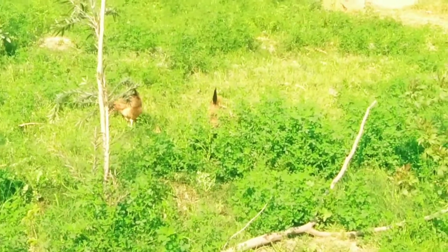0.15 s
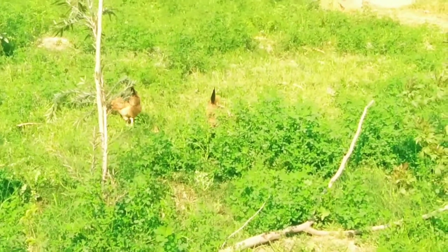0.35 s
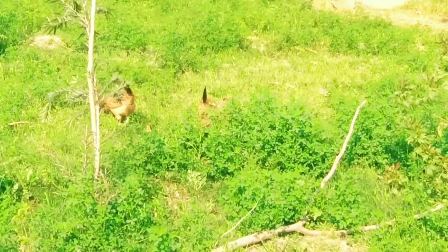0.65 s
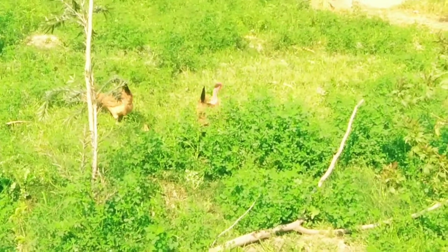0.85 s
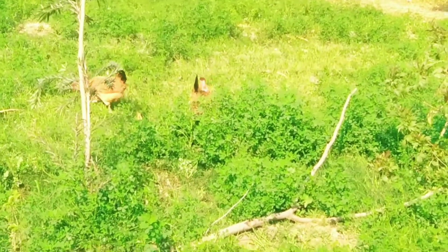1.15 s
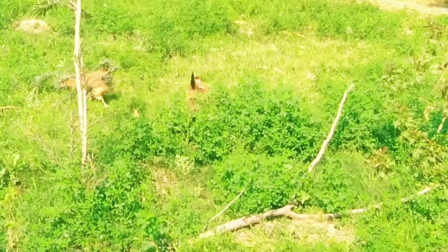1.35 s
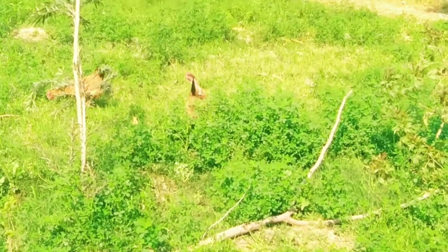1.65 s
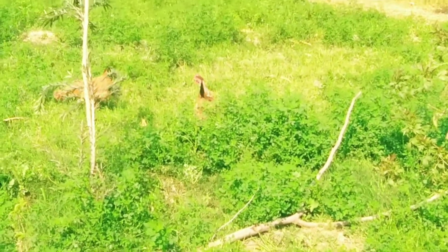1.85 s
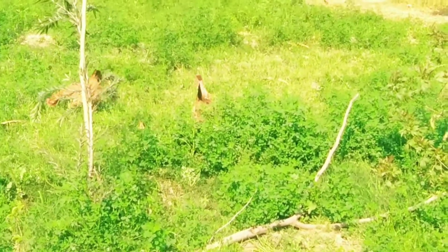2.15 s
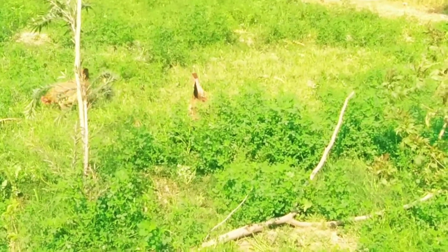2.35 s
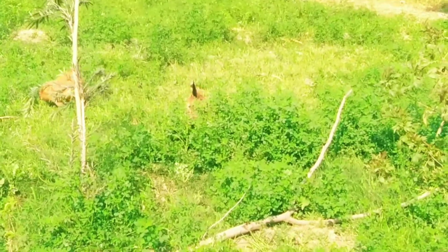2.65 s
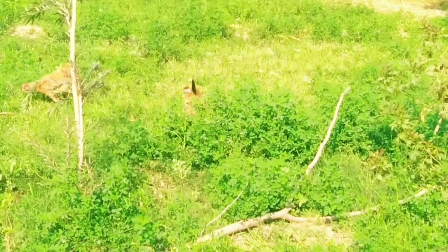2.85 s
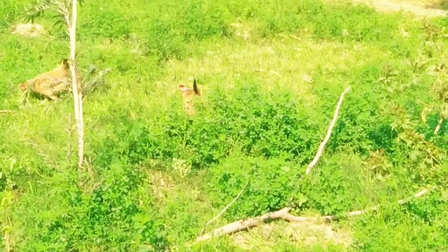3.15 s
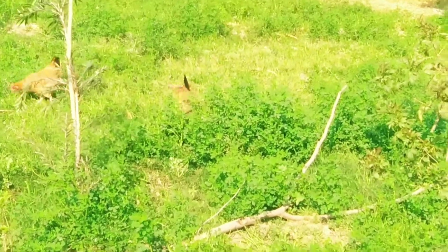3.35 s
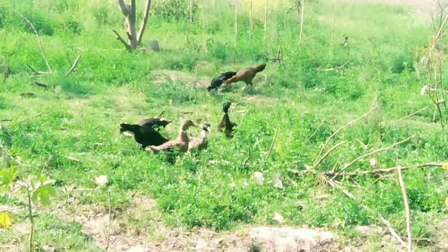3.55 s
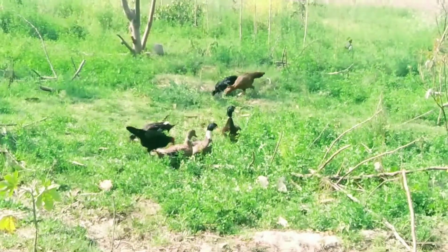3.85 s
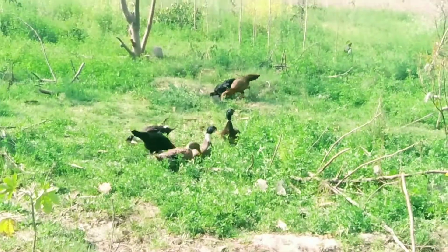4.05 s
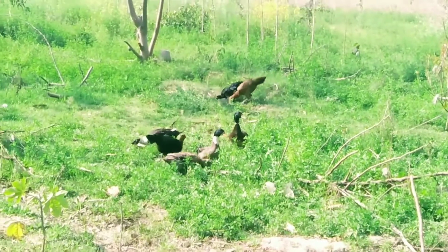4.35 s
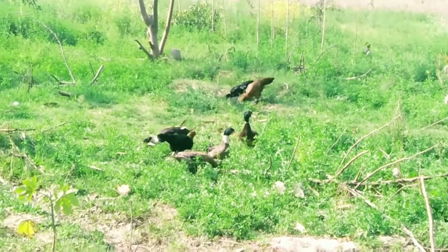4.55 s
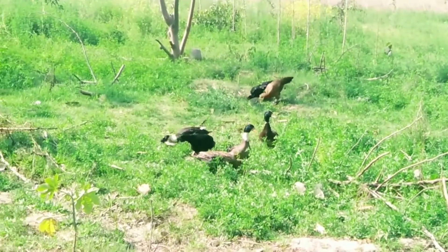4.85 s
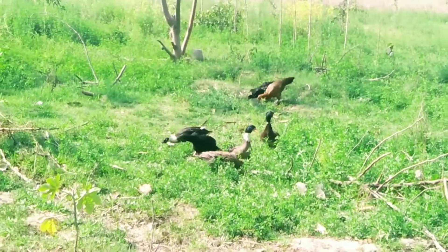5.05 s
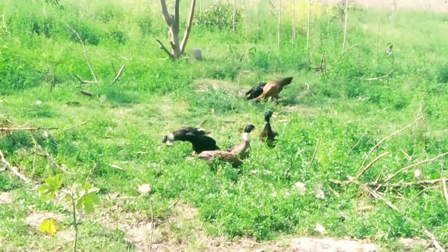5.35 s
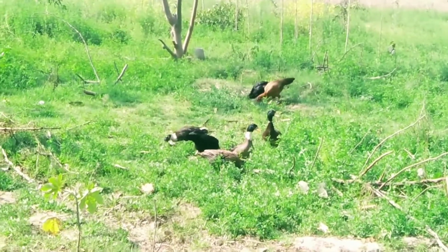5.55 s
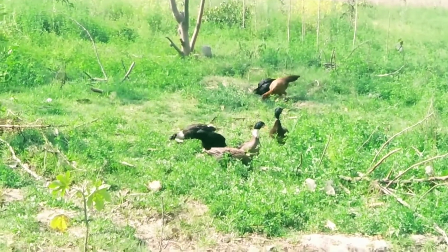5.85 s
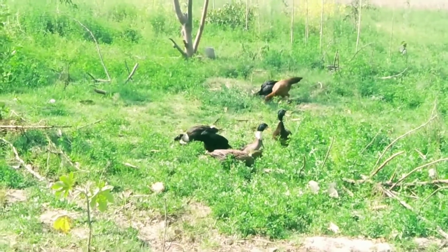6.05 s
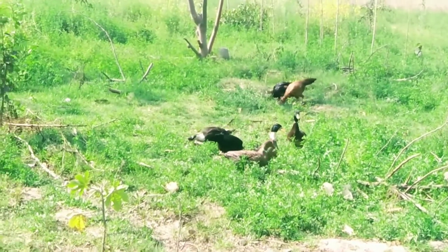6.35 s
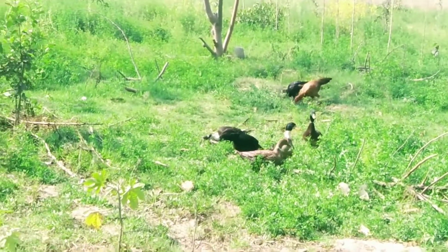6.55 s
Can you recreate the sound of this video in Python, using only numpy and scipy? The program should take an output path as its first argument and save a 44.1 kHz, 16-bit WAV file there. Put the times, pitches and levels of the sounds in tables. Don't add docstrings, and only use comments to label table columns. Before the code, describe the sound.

A windy meadow with poultry, close dry sounds over a thin, patchy background. From 0 s a faint drone and low wind rumble; twigs tick near 0.3 s as a drake huffs a hoarse, voiceless breath. A hen gives one rising cluck at about 0.6 s. A second huff comes at 0.9 s, with heavy wind thumps around 1.15 and 1.6 s and thin indrawn air between. Stronger huffs at 1.7 and 2.3 s surround a reedy, whistling wheeze near 2.1 s. More thuds and dry grass snaps follow until everything cuts at 3.1 s. Silence lasts until about 3.65 s, then a calmer scene fades in. Short, falling duck quacks repeat about every quarter second from 3.9 to 4.9 s, among chick peeps, clicks and stirring straw. Distant hens squeal from 5.4 s, a louder one at 6.3 s, and weaker quacks return from 6.1 to 6.5 s.

```python
import sys
import numpy as np
from scipy import signal
from scipy.fft import rfft, irfft, next_fast_len
from scipy.io import wavfile
from scipy.ndimage import uniform_filter1d, map_coordinates

SR = 44100
rng = np.random.default_rng(int(sys.argv[2]) if len(sys.argv) > 2 else 0)


def boost(x):
    u = np.asarray(x, float) / 20
    return 10 ** u


def wav_record(signal):
    frames = np.transpose(np.atleast_2d(signal))
    bounded = np.clip(frames, -1, 1)
    quanta = np.round(bounded * 32767).astype(np.int16)
    wavfile.write(sys.argv[1], SR, quanta)


N = 296352
T = np.arange(N) / SR
CUT_S = 3.3
WIDE_S = 1.5

# (time [s], level [dB])
OPENNESS = [(0, 15), (.2, 0.5), (.49, -13), (.74, 4.5), (1.58, -9.5), (2.02, 4.5), (2.93, -4.5),
            (3.75, 0.5), (3.9, -2.5), (4.35, 0.5), (6.72, 3.5)]
# (time [s], level [dB])
DRONE_LEVEL = [(0, 6.5), (.2, 3.5), (.28, -13), (.5, -18), (.56, 4.5), (1.2, -0.5), (1.35, -11), (1.7, -9),
               (1.95, -11.5), (2.02, 3), (2.28, 0.5), (2.32, -6.5), (2.42, -7), (2.5, 1), (2.75, -4),
               (2.82, -12), (3.3, -8), (3.75, 1.5)]
# (frequency [Hz], density [dB per Hz])
DRONE_SPECTRUM = [(150, -22.5), (240, 2.5), (400, 0), (680, -2.5), (880, -6), (1100, -35.5)]
MURMUR_SPECTRUM = [(450, -31.5), (700, 1), (1900, 8), (3200, -0.5), (4500, -23.5)]
LEAF_SPECTRUM = [(1800, -27), (3000, -6), (5000, 2), (6500, -5), (7800, 0.5), (8700, -7.5), (9300, -27),
                 (12000, -46.5), (15500, -51)]
# (time [s], level [dB], t60 [s])
STRAW_STIRS = [(4.44, -68, .5), (4.58, -69, .6), (4.8, -78, .5), (4.9, -70, 0.898), (5.11, -72, 0.84),
               (5.37, -71, 0.46), (5.6, -73, 1.6), (5.92, -81, 0.498), (6.3, -71, 0.65), (6.5, -65, 0.75)]
CRISP_STIRS = [(4.58, -77, .5), (4.8, -81, .3), (4.9, -77, .7), (5.11, -80, .7), (5.37, -80, .4)]
# (frequency [Hz], t60 [s])
YARD_DECAY = [(200, 0.21), (2000, 0.25), (10000, 0.31)]
# (time [s], level [dB])
BUFFETS = [(0, -43), (.4, -52.5), (.88, -49), (1.02, -44.5), (1.38, -36), (1.86, -49), (2.05, -44),
           (2.47, -55), (2.63, -34), (2.9, -53.5), (3, -41), (3.9, -57), (4.15, -55), (4.88, -58),
           (5.28, -48), (5.45, -55), (6.35, -55), (6.72, -55.5)]
# (time [s], peak [dB], frequency [Hz])
THUMPS = [(0.192, -38.5, 76.5), (0.228, -35.5, 94), (.533, -28.5, 97), (1.02, -33, 75),
          (1.142, -24.5, 126.3), (1.158, -10.5, 157), (1.173, -18.5, 121), (1.2, -25, 116),
          (1.217, -22, 95), (1.236, -26, 104.6), (1.258, -20, 132), (1.274, -28, 99), (1.402, -26.5, 121),
          (1.439, -28.5, 91), (1.543, -28, 144), (1.56, -17.5, 196), (1.593, -14.5, 180),
          (1.634, -24, 103.5), (2.052, -20, 141), (2.067, -12, 105), (2.092, -19.5, 112), (2.158, -32, 79),
          (2.461, -18, 149.4), (2.473, -18, 93.2), (2.493, -26.5, 102), (2.515, -29, 110),
          (2.529, -29.5, 120), (2.619, -26, 116.2), (2.645, -28, 111), (2.658, -19.5, 120),
          (2.696, -19.5, 85), (2.862, -29, 137), (2.882, -22.5, 99), (2.969, -34, 141), (5.016, -41, 113.6),
          (5.172, -36, 102.7), (5.207, -32.5, 90)]
# (frequency [Hz], density [dB per Hz])
RUMBLE_SPECTRUM = [(12, -50.5), (20, -17.5), (65, 4.5), (123, -3.5), (175, -8.5), (226, -14), (700, -53),
                   (910, -86), (1540, -120)]
CRACKLE_SPECTRUM = [(140, -29.5), (220, 13), (350, 5.5), (520, -9.5), (750, -21), (950, -31.5),
                    (1300, -77.5)]
# (time [s], peak [dB], brightness [dB])
TICKS = [(.247, -50, -6), (.262, -47, 0), (.2755, -38, -6), (.294, -41, -10), (1.4655, -47, 1),
         (1.933, -45, 8), (2.0163, -33, 4), (2.2327, -40, 0), (2.9974, -47, 9), (3.096, -48, -16),
         (4.479, -47, 2), (4.5865, -34, 4), (4.808, -39, -8), (4.9108, -40, -4), (4.956, -54, 4),
         (5.014, -56, 6), (5.063, -36, -50), (5.166, -45, -6), (5.208, -42, -20)]
# (time [s], peak [dB])
PECKS = [(4.612, -42), (4.758, -45), (4.848, -44), (4.891, -44), (4.925, -44), (5.125, -41), (5.136, -45),
         (5.232, -46), (5.251, -46), (6.093, -44)]
SNAPS = [(2.6382, -52), (2.7814, -55), (2.7874, -51), (2.8283, -44.5), (2.8343, -45.5), (2.8518, -40.5),
         (2.9026, -47), (2.9959, -47.5)]
# (time [s], length [s],
# start [Hz], end [Hz], level [dB])
PEEPS = [(2.765, 0.0238, 1338, 1203, -49.5), (2.922, .03, 1431, 1186, -54),
         (3.833, 0.0245, 2820, 4030, -55.5), (3.888, .02, 4400, 2500, -64), (4.082, .024, 3000, 3820, -63),
         (4.515, .016, 4850, 4750, -60), (4.288, .028, 1881, 1032, -58), (4.362, 0.03, 2685, 3963, -61),
         (4.39, .075, 4955, 5150, -56.5), (4.01, .012, 4908, 4704, -61), (4.266, .012, 4953, 4800, -55),
         (5.52, 0.0393, 611, 590, -59), (6, .07, 527, 470, -58), (6.207, .022, 1443, 977, -56),
         (6.4, .028, 630, 648, -57), (6.428, 0.026, 3767, 3200, -60), (6.567, 0.048, 1900, 1900, -57.5),
         (6.7, 0.02, 1574, 1650, -54)]
# (time [s], hold [s], top [Hz], fall [s], level [dB])
CHEEPS = [
    (4.816, .068, 3208, 0.026, -53),
    (5.025, 0.079, 3245, 0.047, -53.5),
    (6.455, 0.087, 3100, 0.022, -52.5),
]
# (time [s], frequency [Hz], level [dB])
WHISTLE = [(2.098, 1602, -37.5), (2.112, 1736, -35.5), (2.122, 1628, -33.5), (2.128, 1287, -42),
           (2.14, 1285, -36.5), (2.15, 1212, -39), (2.158, 1566, -31.5), (2.176, 1580, -31),
           (2.182, 1570, -42), (2.19, 1570, -30), (2.195, 1555, -31.5), (2.199, 1170, -41),
           (2.25, 1180, -51)]
# (middle [s], half length [s], rate [Hz])
TRILLS = [
    (4.85, 0.036, 49),
    (6.047, 0.0467, 76),
    (6.482, 0.051, 58),
]
# (time [s], length [s], start [Hz], end [Hz], level [dB])
FAR_HENS = [
    (5.43, 0.096, 400.5, 576, -58),
    (5.69, 0.15, 859, 854, -55),
    (6.2, 0.047, 543, 507, -60),
    (6.322, 0.053, 1506, 1466, -42),
    (6.385, 0.055, 1452, 1406, -50),
]
SQUEALS = [
    (5.528, 0.05, 1130, 1170, -57),
    (5.582, 0.065, 1180, 1413, -58.5),
    (5.98, .125, 1336, 1327, -50),
]
HEN_PARTIALS_DB = (0.5, -4, -12, -24, -32)
SQUEAL_PARTIALS_DB = (-7, 2, 1, -14, -30)
# (frequency [Hz], level [dB])
FAR_BEAK = [(500, 5.5), (1000, -9.5), (1500, -6), (3000, -3.5), (4500, -10)]
# (time [s], length [s], first pitch [Hz], level [dB], bill opening [dB])
QUACKS = [
    (3.885, 0.064, 269.6, -37.5, -7),
    (4.141, 0.065, 285, -34.5, -5.5),
    (4.409, 0.049, 299, -35.5, 5.5),
    (4.652, 0.051, 300.1, -34.5, 1),
    (4.891, 0.051, 290.1, -35.5, 2.5),
    (6.09, 0.0453, 266.9, -39.5, -5),
    (6.306, 0.055, 303.7, -36.5, -6.5),
    (6.511, 0.051, 270, -34, -5.5),
]
# (frequency [Hz], width [Hz], level [dB])
DUCK_THROAT = [(270, 164, -7), (583, 128, -5.5), (1170, 830, -21)]
BILL = [(1180, 440, -0.5), (1670, 350, -3.5)]
# (time [s], pitch [Hz], level [dB])
CLUCK = [(.545, 397.8, -38.5), (.565, 451, -35.5), (.585, 517, -30), (.605, 553, -28.5),
         (.632, 555.5, -32.5), (.645, 556, -38.5), (.67, 562.7, -41.5), (.72, 552.4, -50.5),
         (.9, 552, -71.5)]
# (frequency [Hz], width [Hz], level [dB])
HEN_THROAT = [(299, 290, -11.5), (545, 220, -2), (1100, 250, 0.5), (1665, 200, 0.5), (2190, 200, -2),
              (3000, 1200, -15)]
HEN_BEAK = [(4120, 500, -0.5), (5900, 590, -0.5), (7400, 900, -6.5), (9000, 970, -10.5),
            (13500, 4000, -28.5)]
# (time [s], length [s], effort [dB], release [s], air [dB])
HUFFS = [
    (0.283, 0.24, -42.5, 0.064, -16.5),
    (0.918, 0.22, -42, 0.11, -19),
    (1.675, .3, -34, 0.062, -13.5),
    (2.285, 0.25, -34.5, 0.31, -14.5),
]
HUFF_DROPS_DB = (27, 6.2, 2.5, 22.2)
MOUTH_HZ = (640, 790, 900, 770, 800)
# (frequency [Hz], width [Hz], level [dB])
THROAT = [
    [(1170, 110, -8.5), (1346, 158.4, -6), (1570, 310, -3.5), (1920, 180, 0), (2198, 157, -6)],
    [(1140, 95, -2), (1490, 150, -2), (1906, 180, -0.5), (2160, 120, -3), (2390, 150, -10)],
    [(1120, 128, -6.5), (1515, 150, -4.5), (1893, 186, 0), (2160, 148, -3.5), (2494, 150, -13.5)],
]
# (frequency [Hz], width [Hz], level [dB])
BEAK = [(4550, 350, 7), (4163, 410, 6.5)]
AIR = [(5770, 500, 2), (6870, 950, 1), (7970, 760, 1.5), (9280, 380, -2.5), (11500, 9000, -20)]
CLOSING = [(900, 160, -7), (1350, 100, 4.5)]
# (time [s], length [s], start [Hz], end [Hz], level [dB])
INDRAW = [(.23, 0.062, 3800, 3800, -68), (.24, 0.14, 2800, 2800, -66.5), (.22, 0.09, 6700, 7000, -60),
          (.2, .1, 8700, 7200, -60.5), (1.222, .19, 3950, 3650, -60), (1.225, 0.13, 3480, 3400, -60),
          (1.235, 0.2, 3050, 3090, -62), (1.22, .22, 2100, 2300, -64.5), (1.21, 0.2, 6200, 6150, -65.5),
          (1.22, .1, 6300, 6950, -66), (1.24, 0.091, 8300, 8000, -66), (1.492, .13, 3890, 3950, -57),
          (1.53, 0.13, 4360, 4450, -61.5), (1.47, 0.24, 5600, 6750, -61), (1.455, .2, 7470, 8300, -62.5),
          (1.465, .15, 8800, 8900, -65), (1.56, 0.14, 3520, 3200, -59), (1.58, .12, 2900, 2500, -62),
          (1.55, 0.14, 2400, 2100, -59)]
LEAKS = [(1.71, 0.067, 3550, 3450, -57), (2.272, .05, 3550, 3450, -56), (0.93, 0.12, 3300, 3250, -70),
         (2.05, .17, 3500, 3300, -50), (2.15, .08, 2200, 2100, -47), (2.21, 0.15, 1560, 1400, -49),
         (1.66, .05, 1500, 1550, -53), (.918, 0.06, 1500, 1800, -54), (2.56, 0.28, 4000, 3850, -66.5),
         (2.79, 0.14, 1200, 1230, -65), (2.78, 0.3, 6050, 5800, -71.5), (2.88, 0.21, 6600, 6500, -69.5),
         (2.74, .32, 9000, 8900, -67), (2.9, 0.116, 2100, 2000, -65.5), (2.92, 0.095, 2600, 2500, -70),
         (2.95, .14, 1360, 1300, -63)]
# (frequency [Hz], width [Hz], level [dB])
FAR_THROAT = [(3050, 310, 1), (4270, 170, 1), (5000, 440, -2.2)]
# (time [s], effort [dB])
WHEEZE = [(1.94, -55.5), (2, -39.5), (2.04, -36), (2.1, -34.5), (2.17, -37), (2.23, -44), (2.33, -54.5)]
# (time [s], length [s])
PUFFS = [
    (2.012, 0.052),
    (2.075, 0.052),
    (2.156, .045),
]
# (frequency [Hz], width [Hz], level [dB])
REED = [(1132, 230, -1), (1641, 130, 0)]
RASP = [(2432, 200, 0.5), (2883, 280, -1.5), (2020, 200, -15.5)]
# (time [s], level [dB])
SETTLING = [(3.29, 0), (3.3, 7.5), (3.84, 0), (3.91, -38)]


def unit(x):
    return x / np.sqrt(np.mean(x ** 2) + 1e-20)


def along(points, hz):
    f, v = np.transpose(points)
    return np.interp(np.log(hz + 1), np.log(f + 1), v)


def curves(spans, edge_s=0.004):
    s, *cols = np.concatenate(spans).T
    gate = sum(np.clip(np.minimum(T - r[0][0], r[-1][0] - T) / edge_s + .5, 0, 1) for r in spans)
    return [np.minimum(gate, 1)] + [np.interp(T, s, c) for c in cols]


def glides(rows, rise_db, fall_db, peak_at, arch_per_s=0):
    spans = []
    for s, d, a, b, db in rows:
        peak_hz = (a + peak_at * (b - a)) * (1 + arch_per_s * d)
        spans.append([(s, a, db - rise_db), (s + peak_at * d, peak_hz, db), (s + d, b, db - fall_db)])
    return spans


def wobble(rate_hz):
    return map_coordinates(rng.standard_normal(int(N * rate_hz / SR) + 4), [T * rate_hz])


def filtered(x, response):
    m = next_fast_len(N + SR // 4)
    return irfft(rfft(x, m) * response(np.fft.rfftfreq(m, 1 / SR)), m)[:N]


def tract(modes):
    def response(f):
        return sum((-1) ** k * boost(db) * 1j * f * w / (c * c - f * f + 1j * f * w)
                   for k, (c, w, db) in enumerate(modes))
    return response


def steep(modes, low_hz, high_hz):
    return lambda f: tract(modes)(f) / (1 + (low_hz / (f + 1)) ** 8) / (1 + (f / high_hz) ** 8)


def shaped(points):
    def gain(hz):
        ratio = np.maximum((hz + 1) / points[-1][0], points[0][0] / (hz + 1))
        return boost(along(points, hz) - 60 * np.maximum(0, np.log2(ratio)))
    return gain


def noise(response, patchy_db=2, wide=5, long=8):
    z = signal.stft(rng.standard_normal(N), nperseg=512)[2]
    field = uniform_filter1d(uniform_filter1d(rng.standard_normal(z.shape), wide, 0), long, 1)
    patchy = signal.istft(z * boost(patchy_db * unit(field)), nperseg=512)[1][:N]
    return unit(filtered(patchy, response))


def pulses(hz, uneven, count):
    turn = 2 * np.pi * np.cumsum(hz) / SR
    harmonics = np.sin((count + .5) * turn) / (2 * np.sin(turn / 2) + 1e-9) - .5
    breath = (1 + np.cos(turn)) ** 2 * rng.standard_normal(N)
    return unit(harmonics * (1 + uneven * np.cos(turn / 2))), unit(breath)


def stirs(rows):
    return sum(boost(db - 60 * np.maximum(T - s, 0) / t60) * np.clip((T - s) / 0.022, 0, 1)
               for s, db, t60 in rows)


def meadow():
    first = T < CUT_S
    open_db = np.interp(T, *np.transpose(OPENNESS))
    murmur_db = np.where(first, -64, -61) + open_db + wobble(7.5)
    murmur = boost(murmur_db) * noise(shaped(MURMUR_SPECTRUM), patchy_db=4.0)
    drone_db = np.where(first, -58, -64.5) + np.interp(T, *np.transpose(DRONE_LEVEL))
    drone = boost(drone_db) * noise(shaped(DRONE_SPECTRUM), patchy_db=3)
    leaf_db = np.where(first, -74.5, -60) + np.where(first, 0.29, 1.52) * open_db
    leaves = boost(leaf_db) * noise(shaped(LEAF_SPECTRUM), patchy_db=1.5)
    straw = stirs(STRAW_STIRS) * noise(shaped([(8800, 5.5), (11500, -13.5)]), patchy_db=6.5, wide=2, long=14)
    whisper_level = boost(-74.5) * first + stirs(CRISP_STIRS) * boost(5 * wobble(25))
    whisper_spectrum = [(9000, -2), (10800, -5.5), (11800, -14.0), (12600, -2), (15500, -3.5)]
    whisper = whisper_level * noise(shaped(whisper_spectrum), patchy_db=2.0, wide=2, long=16)
    return whisper + straw + drone + murmur + leaves


def yard(x):
    hz, t, z = signal.stft(rng.standard_normal(SR // 2), SR, nperseg=256)
    tail = signal.istft(z * boost(-60 * t / along(YARD_DECAY, hz)[:, None]), SR, nperseg=256)[1]
    return signal.fftconvolve(np.pad(x, (500, 0)), tail / np.linalg.norm(tail))[:N]


def wind():
    buffet_db = np.interp(T, *np.transpose(BUFFETS)) + np.where(T < CUT_S, 4, 1.5) * wobble(24)
    t = np.arange(SR // 8) / SR
    thumps = np.pad(boost(buffet_db) * noise(shaped(RUMBLE_SPECTRUM)), (0, len(t)))
    crackle = np.zeros(len(thumps))
    gaps_s = np.diff(np.transpose(THUMPS)[0], prepend=0)
    phases = rng.uniform(0, 2 * np.pi, len(THUMPS))
    for (s, db, hz), gap_s, phase in zip(THUMPS, gaps_s, phases):
        start = round(s * SR)
        swell = t * hz * 3.52 * np.exp(1 - t * hz * 1.98)
        thumps[start:][:len(t)] += boost(db - 3.0) * swell * np.sin(2 * np.pi * hz * t + phase)
        edge_db = -23.5 + 0.92 * (db + 20.5) + 10 * (gap_s > .038)
        crackle[start:][:len(t)] += boost(db + edge_db) * (t / 0.0096 * np.exp(1 - t / 0.011)) ** 2
    soft = filtered(thumps, lambda f: 1 / (1 + 1j * f / 600) ** 3)
    return soft + crackle[:N] * noise(shaped(CRACKLE_SPECTRUM))


def clicks(times_s, peaks_db, t60_s, grit):
    t = np.arange(400) / SR
    out = np.zeros(N + 400)
    for s, db, burst in zip(times_s, peaks_db, grit):
        out[round(s * SR):][:400] += boost(db - 60 * t / t60_s) * burst
    return out


def ticks():
    s, db, bright_db = np.transpose(TICKS)
    grit = rng.standard_normal((len(TICKS), 400))
    low = clicks(s, db, 0.028, grit)
    high = clicks(s, db + bright_db - 1.5, 0.0038, grit)
    pecks = clicks(*np.transpose(PECKS), 0.016, rng.standard_normal((len(PECKS), 400)))
    snaps = clicks(*np.transpose(SNAPS), 0.014, rng.standard_normal((len(SNAPS), 400)))
    out = filtered(pecks, lambda f: tract([(7500, 1600, 0)])(f) ** 2)
    out += filtered(snaps, lambda f: tract([(8800, 5000, -3)])(f) / (1 + (7400 / (f + 1)) ** 12))
    out += filtered(low, lambda f: tract([(5000, 4000, 0)])(f) / (1 + (f / 8500) ** 8))
    return out + filtered(high, tract([(9000, 4000, 0), (14000, 3000, -12)]))


def trill_beat():
    return sum(np.sin(2 * np.pi * rate * (T - s)) * (abs(T - s) < half) for s, half, rate in TRILLS)


def far_hens(beat):
    hens = glides(FAR_HENS, 5.33, 4.5, 0.18), HEN_PARTIALS_DB
    squeals = glides(SQUEALS, 4.6, 6.8, .55, arch_per_s=2.9), SQUEAL_PARTIALS_DB
    out = np.zeros(N)
    for calls, partials_db in (hens, squeals):
        gate, hz, db = curves(calls)
        turn = 2 * np.pi * np.cumsum(hz * (1 + 0.044 * beat + 0.0117 * wobble(90))) / SR
        for k, partial_db in enumerate(partials_db, 1):
            over_db = partial_db + along(FAR_BEAK, k * hz) + 6.0 + k * wobble(110)
            out += gate * boost(db + over_db) * np.sin(k * turn)
    return out


def chicks(beat):
    cheeps = []
    for s, hold, hz, fall, db in CHEEPS:
        drop_hz, end = fall * 36000, s + hold
        cheeps.append([(s, .9 * hz, db - 6), (s + 0.58 * hold, hz, db - 5.5), (end, .97 * hz, db - 1.0),
                       (end + 0.43 * fall, 0.89 * hz - 0.37 * drop_hz, db + 4.0),
                       (end + fall, .97 * hz - drop_hz, db - 18)])
    calls = sorted(glides(PEEPS, 6.6, 2.6, 0.36) + cheeps + [WHISTLE])
    gate, hz, db = curves(calls, edge_s=0.0035)
    turn = 2 * np.pi * np.cumsum(hz * (1 + 0.047 * beat + 0.013 * wobble(120))) / SR
    level_db = db + 6.5 + 2.2 * beat + np.where(T < CUT_S, 1, 4) * wobble(130)
    return gate * boost(level_db) * np.sin(turn)


def hen():
    gate, hz, db = curves([CLUCK])
    tone, breath = pulses(hz * (1 + 0.0234 * wobble(120)), 0.25, count=7)
    voice = unit(filtered(tone + .7 * breath, lambda f: tract(HEN_THROAT)(f) / (1 + (f / 3900) ** 8)))
    hiss = unit(filtered(breath, lambda f: tract(HEN_BEAK)(f) / (1 + (3300 / (f + 1)) ** 8)))
    hiss_db = 0.77 * (db + 26.0) - 16.5 + 4 * wobble(120)
    return -gate * boost(db + 1.5 * wobble(71.9)) * (voice + boost(hiss_db) * hiss)


def duck():
    spans = []
    for i, (s, d, hz, db, bill, *_) in enumerate(QUACKS):
        sag = .93 if i == len(QUACKS) - 1 else .73
        spans.append([(s, hz, db - 18.5, bill, d, 0), (s + 0.1996 * d, hz, db - 5, bill, d, .4),
                      (s + .45 * d, (1 - .37 * (1 - sag)) * hz, db, bill, d, .8),
                      (s + d, sag * hz, db - 6.0, bill, d, 1)])
    gate, hz, db, bill_db, length_s, opening = curves(spans, edge_s=0.007)
    hoarse = np.clip(.55 - .03 * bill_db + 70 * (length_s - .051), 0, 1)
    tone, breath = pulses(hz * (1 + 0.0198 * wobble(200)), 0.12, count=9)
    cut = lambda f: 1 / (1 + (f / 2300) ** 10)
    voice = filtered(tone + 0.6 * breath, lambda f: tract(DUCK_THROAT)(f) * cut(f))
    shut, wide = (filtered(tone + 4.2 * breath, lambda f: tract([mode])(f) * cut(f)) for mode in BILL)
    voice += boost(bill_db) * ((1 - opening) * shut + opening * wide)
    spill_modes = [(2600, 700, 0), (4000, 900, -3), (5200, 900, -5)]
    spill = unit(filtered(breath, lambda f: tract(spill_modes)(f) / (1 + (f / 6000) ** 6)))
    return gate * boost(db) * (unit(voice) + (.06 + .16 * hoarse ** 2) * opening * spill)


def breath_bands(rows):
    width, peak_at, fringe_width = 0.079, 0.24, .3
    out = np.zeros(N)
    for s, d, a, b, db in rows:
        u = np.linspace(0, 1, round(d * SR))
        grit = rng.standard_normal((2, SR // 2))[:, :len(u)]
        smooth = lambda v, over: unit(uniform_filter1d(v, round(SR / (over * a)), axis=1))
        core = smooth(smooth(grit, width), 2 * width)
        fringe = smooth(smooth(grit[::-1], fringe_width), fringe_width)
        rough = core + boost(-7) * fringe
        turn = 2 * np.pi * np.cumsum(a + (b - a) * u) / SR
        swell = np.sin(np.pi / 2 * np.minimum(u / peak_at, (1 - u) / (1 - peak_at)))
        band = unit(rough[0] * np.cos(turn) + rough[1] * np.sin(turn))
        out[round(s * SR):][:len(u)] += boost(db) * swell * band
    return out * boost(3 * wobble(34.98))


def huffs(streaky):
    drops_db = np.insert(HUFF_DROPS_DB, 2, 0)
    spans = []
    for s, d, db, release, air in HUFFS:
        times = (0, .045, .45 * d, d, d + release)
        spans.append([(s + at, db - drop, hz, air, at > d) for at, drop, hz in zip(times, drops_db, MOUTH_HZ)])
    gate, db, mouth_hz, air_db, closed = curves(spans, edge_s=.015)
    air_db = air_db - 20.5 * closed
    half_shut = T < WIDE_S

    throats = [streaky(lambda f: abs(steep(modes, 950, 2600)(f)) ** 1.2) for modes in THROAT]
    throat = signal.hilbert(np.choose(np.digitize(T, (WIDE_S, HUFFS[3][0])), throats))
    throat = throat / uniform_filter1d(abs(throat), size=SR // 100) ** .45
    shift_hz = 0.35 * (mouth_hz - max(MOUTH_HZ))
    throat = np.real(throat * np.exp(2j * np.pi * np.cumsum(shift_hz) / SR))
    throat = boost(-15 * np.sqrt(closed)) * throat
    throat += 1.2 * np.sqrt(closed) * streaky(steep(CLOSING, 750, 1600))
    throat += boost(np.where(half_shut, -28, -25)) * streaky(steep([(2797, 1100, 0)], 2300, 5200))

    beaks = [streaky(lambda f: abs(steep([mode], 3500, 5200)(f)) ** 1.2) * boost(mode[2] - 5.5) for mode in BEAK]
    beak = np.where(half_shut, *beaks)
    cavity_hz = mouth_hz - 70 * (T > WIDE_S)
    mouth = streaky(lambda f: 1 / (1 + (f / 55) ** 2)) * np.sin(2 * np.pi * np.cumsum(cavity_hz) / SR)
    mouth = boost(np.where(half_shut, -13, -17)) * (1 - closed) * mouth
    air = streaky(lambda f: abs(steep(AIR, 4700, 14000)(f)) ** 0.98)
    return gate * boost(db) * (throat + mouth + boost(air_db - 1.5) * beak + boost(air_db) * air)


def wheeze(streaky):
    gate, db = curves([WHEEZE], edge_s=0.014)
    db = db + 4 * sum(np.clip(np.minimum(T - s, s + d - T) / .006, 0, 1) for s, d in PUFFS)
    rasp_db = np.minimum(6 - 76 * (T - WHEEZE[1][0]), 2.5) + 2.0
    reed = streaky(steep(REED, 840, 2200))
    rasp = boost(rasp_db) * noise(steep(RASP, 1496, 2500), wide=2, long=12)
    air = boost(-11.5 - .2 * db) * streaky(tract(BEAK[1:] + AIR))
    return gate * boost(db - 4 + 1.5 * wobble(80)) * (reed + rasp + air)


def drake():
    streaks = noise(np.ones_like, patchy_db=4, wide=2, long=40)
    streaky = lambda response: unit(filtered(streaks, response))
    far_swell = np.sin(np.pi * np.clip((T - 5.6) / 0.4, 0, 1))
    far_hiss = boost(-55) * far_swell * streaky(steep(FAR_THROAT, 1900, 5400))
    return huffs(streaky) + breath_bands(INDRAW + LEAKS) + far_hiss + wheeze(streaky)


def scene():
    beat = trill_beat()
    cluck = hen()
    rest = duck() + chicks(beat) + far_hens(beat)
    echo = yard(boost(-2.5) * cluck + boost(-10.5) * rest)
    return (meadow() + wind() + ticks() + cluck + rest + echo + drake())[None]


def roll_off(x):
    return signal.sosfilt(signal.butter(12, 15810, fs=SR, output="sos"), x)


def record(dry):
    hz, t, z = signal.stft(dry[0], SR, nperseg=1024, noverlap=768)
    power = uniform_filter1d(uniform_filter1d(abs(z) ** 2, size=2, axis=0), size=9, axis=1)
    ragged_db = 4.5 * unit(uniform_filter1d(rng.standard_normal(len(hz)), size=3))
    floor = [(100, -100), (400, -71.5), (580, -80.5), (800, -78), (1500, -91.5), (5000, -90.0), (10000, -108)]
    estimate = boost(ragged_db + along(floor, hz))[:, None] ** 2
    estimate = estimate * boost(np.interp(t, *np.transpose(SETTLING))) ** 2
    keep = boost(-26) + (power / (power + estimate)) ** 2
    low_cut_hz = np.where(t < CUT_S, 48, 66)
    z = z * keep / (1 + (low_cut_hz / (hz[:, None] + 1)) ** 6)
    out = signal.istft(z, SR, nperseg=1024, noverlap=768)[1][:N]
    stop = np.clip((3.106 - T) / 0.0033, 0, 1)
    fade_in = np.clip((T - 3.655) / .32, 0, 1) ** 2.2
    mix = out * np.where(T < CUT_S, stop, fade_in)
    return roll_off(mix[None])


dry = scene()
out = record(dry)
wav_record(out)
```